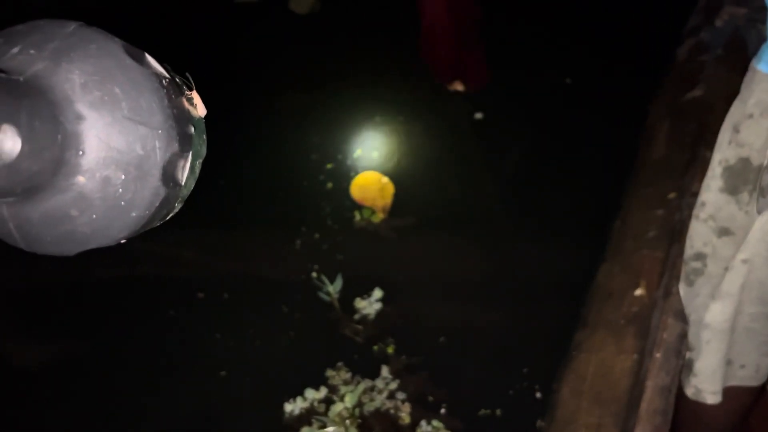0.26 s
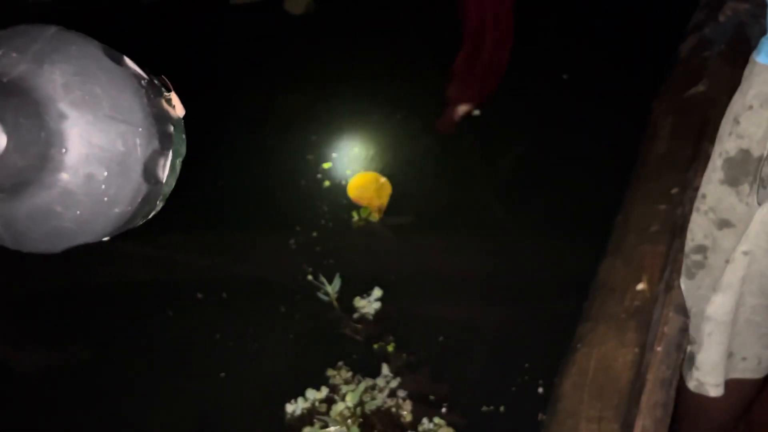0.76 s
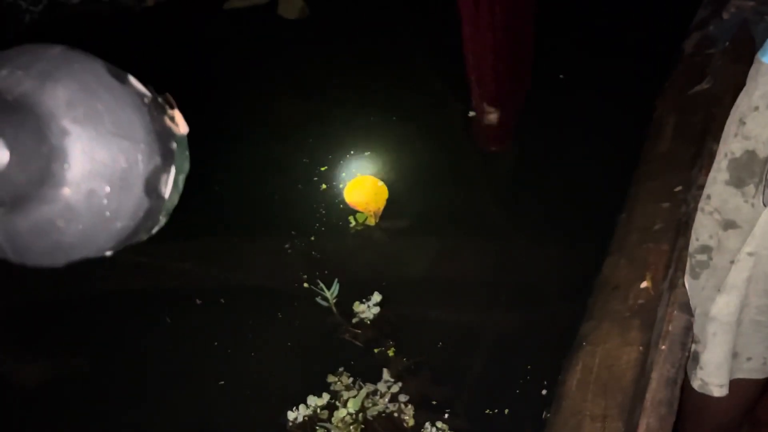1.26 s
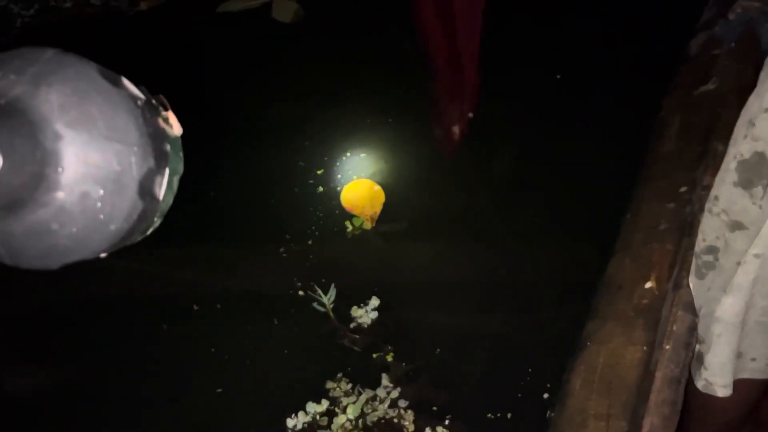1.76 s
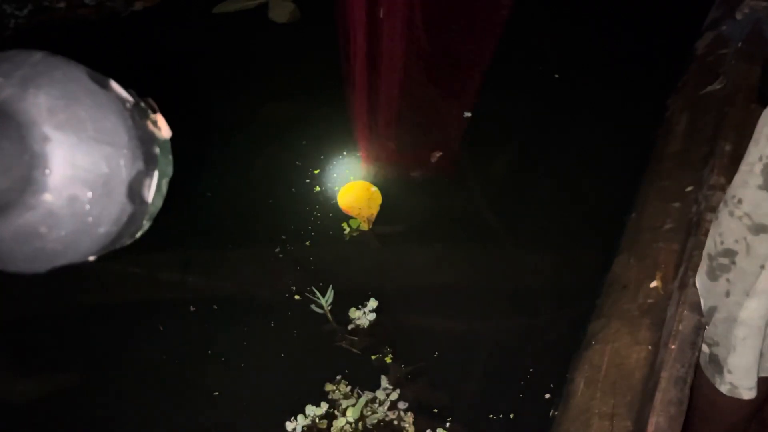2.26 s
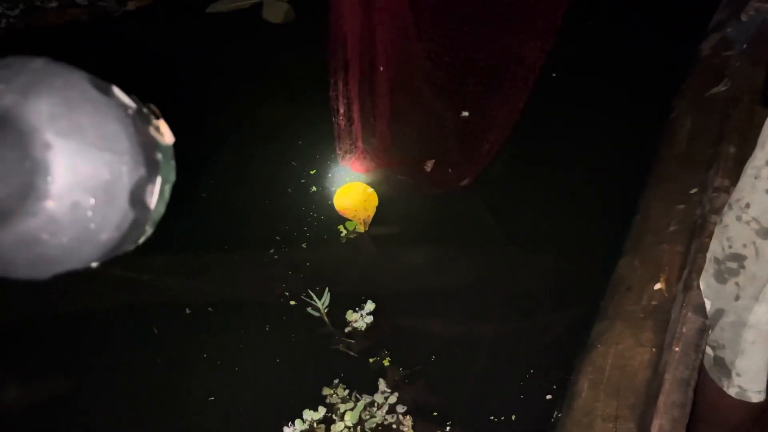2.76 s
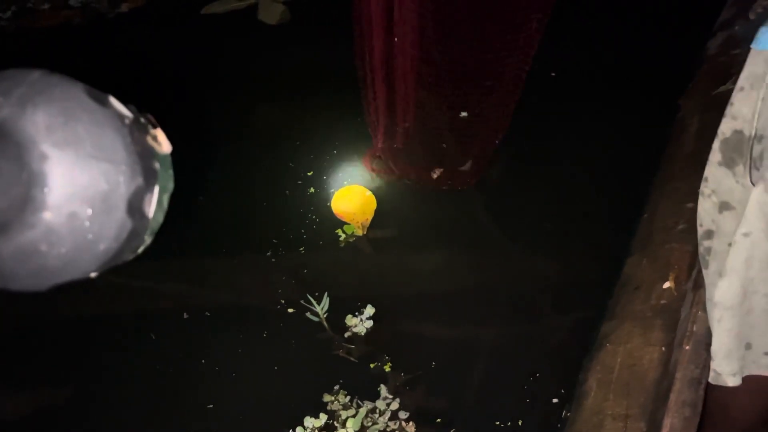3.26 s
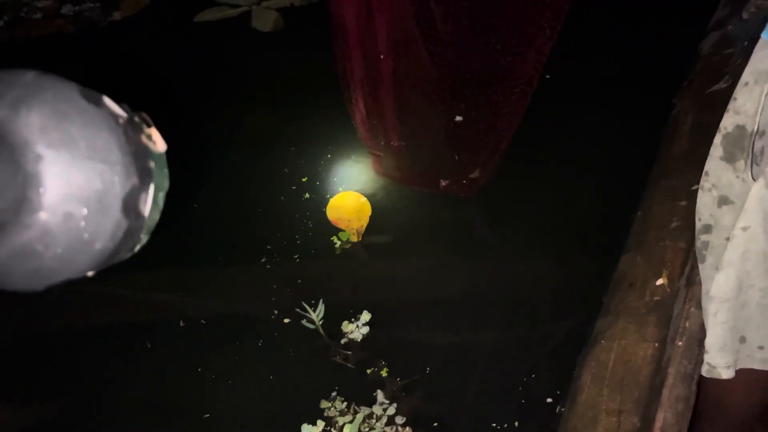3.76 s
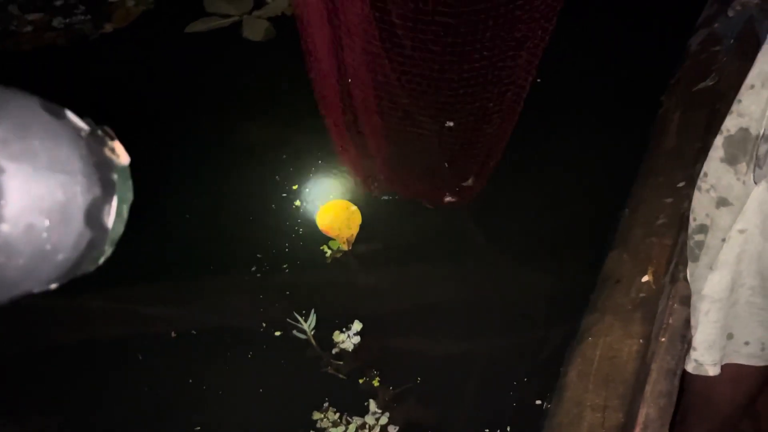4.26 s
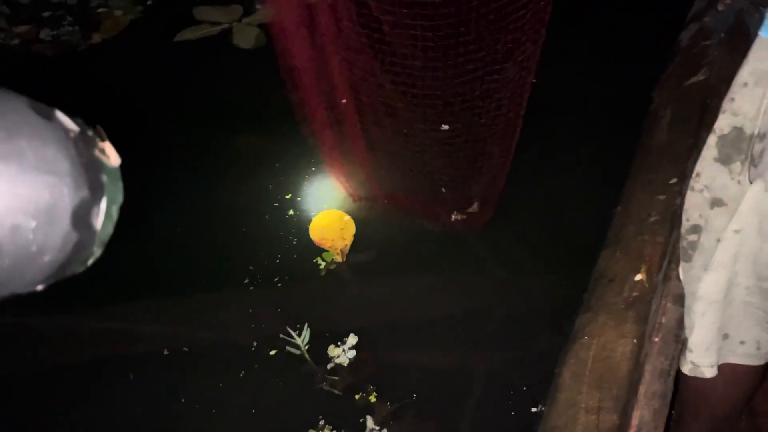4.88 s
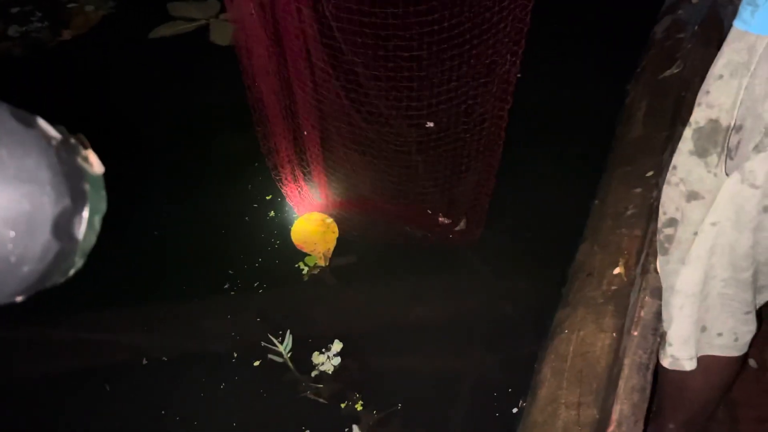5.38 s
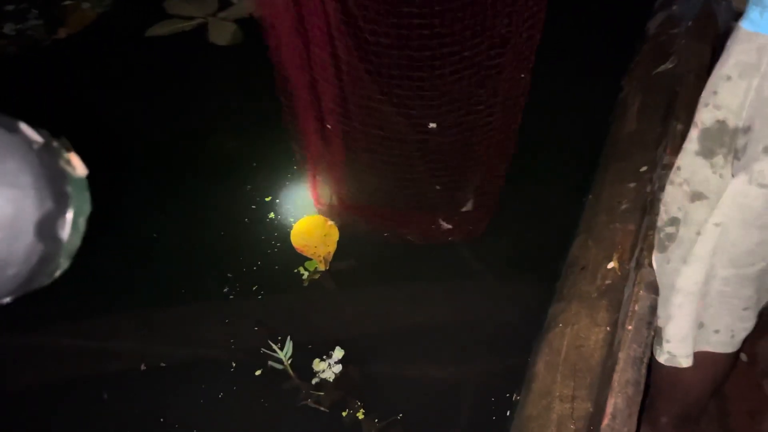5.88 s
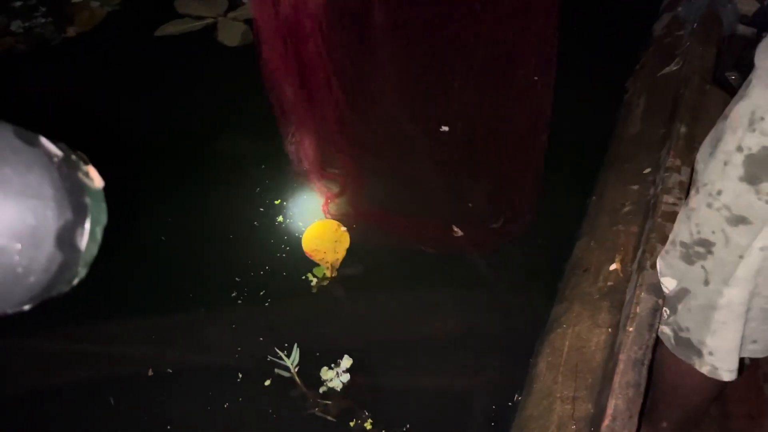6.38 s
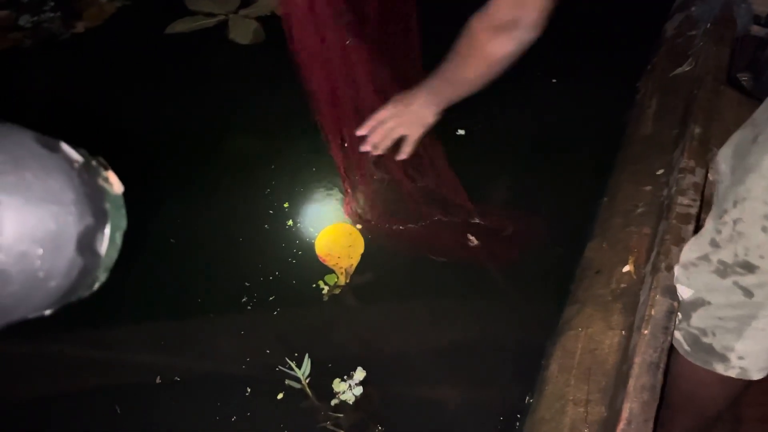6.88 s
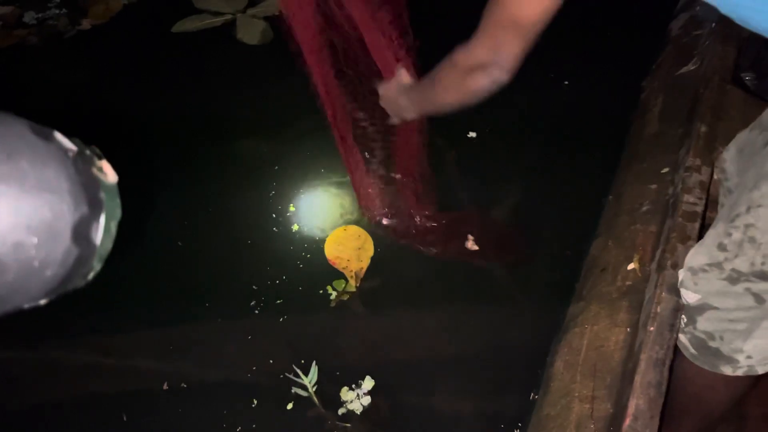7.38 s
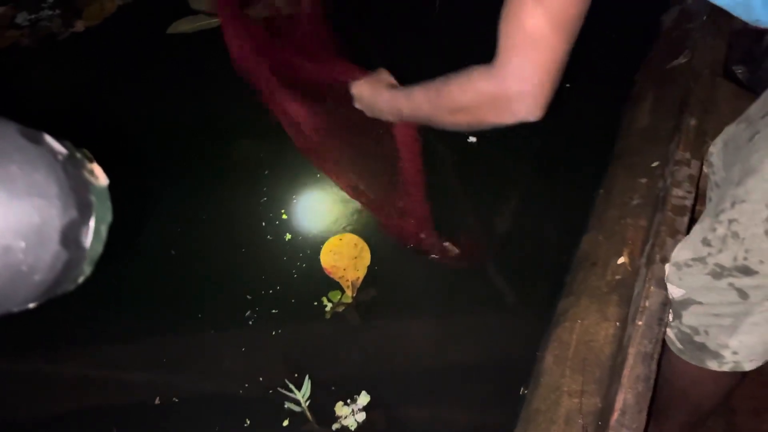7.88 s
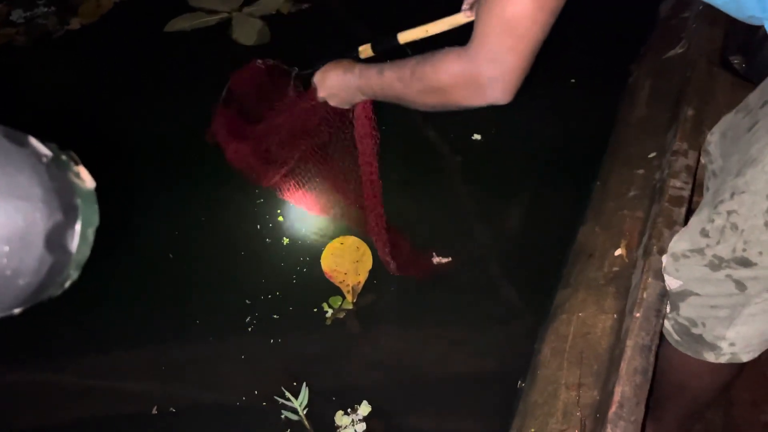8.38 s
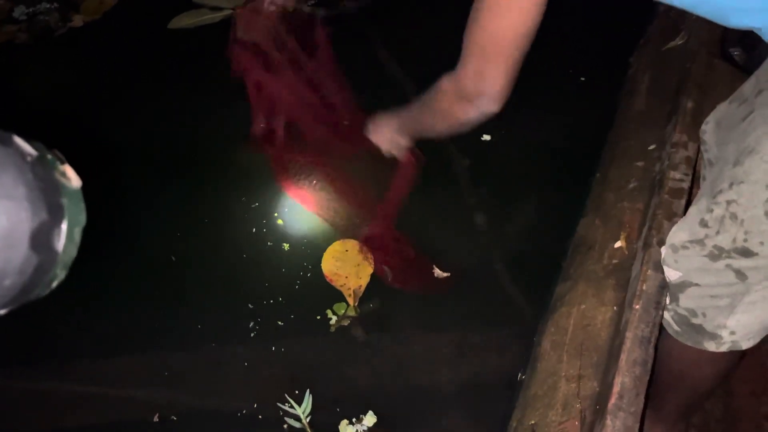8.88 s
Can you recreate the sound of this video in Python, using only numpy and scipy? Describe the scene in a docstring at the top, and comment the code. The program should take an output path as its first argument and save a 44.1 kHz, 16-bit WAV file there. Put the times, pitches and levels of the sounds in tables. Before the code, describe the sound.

A quiet night river heard in stereo from beside a wooden boat, for about nine seconds. Throughout, a katydid holds a very high, dry, raspy buzz above narrow hissing bands of distant insects, low rumble and faint water hush. A near cricket gives quick double chirps around 3 kHz in groups with small gaps; two higher crickets trill in swelling phrases of about a second. From 0.5 to 1.3 s the hull groans low, with soft plank thuds. Hollow frog knocks come in rapid short runs, strongest and leftward at 2.1-2.9 s, then lighter and higher through 8 s, with a strong pair near 8.4 s. Distant frogs murmur in bouts behind. Dull wood thuds fall at 3.4, 3.6 and 4.1 s, and a harder rap at 5.1 s. Tiny gliding peeps sound at 0.6 s, sparsely from 5.9 s, clearest at 8.3 s and clustered to 8.8 s; a barely audible hum swells near 9 s.

```python
"""Night chorus on a river beside a wooden boat

Periodic wing strokes form a katydid's buzz, led by one ear; crickets chirp and trill as short tones and
resonated pulses; a far insect chorus hisses as narrow bands of noise. Frogs knock in short runs as pulses
through throat resonances, gliding tones peep, and noise rings hull and planks as someone shifts weight.
Far rumble and river hush are shaped noise under it all; a faint narrow hum swells once near the end."""
import sys
import numpy as np
from scipy import signal
from scipy.fft import rfft, irfft
from scipy.io import wavfile

SR = 44100
rng = np.random.default_rng(int(sys.argv[2]) if len(sys.argv) > 2 else 0)


def waveform_to_disk(signal):
    """Save audio, clipped to [-1, 1], as 16-bit WAV at the path in sys.argv[1]."""
    frames = np.transpose(np.atleast_2d(signal))
    scaled = np.clip(frames, -1, 1) * 32767
    samples = np.round(scaled).astype(np.int16)
    wavfile.write(sys.argv[1], SR, samples)


N = 403074
HZ = np.maximum(np.arange(N // 2 + 1) * SR / N, 1)  # frequency of each spectrum bin

# Katydid wing-stroke rate: start_s, strokes_hz
STROKES = [(0.0, 277.06), (1.32, 277.25), (3.96, 277.5), (4.95, 277.5), (5.28, 276.0), (5.61, 277.54),
           (5.94, 277.74), (6.27, 278.94), (7.26, 278.78), (7.92, 277.7), (8.3, 277.72), (8.5, 274.96),
           (8.9, 277.18), (9.14, 276.92)]
# Katydid swell, which the rasp follows only in part: start_s, level_db
KATYDID_LEVEL = [(0.0, -53.5), (4.3, -53), (4.66, -54.5), (9.14, -52.5)]
# Relative spectrum of the pitched buzz: frequency_hz, gain_db
BUZZ_SPECTRUM = [(10000, -111), (10800, -13), (11600, -8.5), (12300, 1.5), (13000, -8.5), (13800, -5.5),
                 (14600, -18.5), (15600, -15.5)]
# Relative spectrum of the rasp under it: frequency_hz, gain_db
RASP_SPECTRUM = [(7000, -30), (7800, -10), (8500, -2), (9300, 0), (10200, -1), (11000, -6), (12400, -7),
                 (13300, -13), (14500, -21), (15700, -24)]
RASP_DB = -56.5
# The right ear leads; its phase lead is zero at the first and gains one cycle every TURN Hz
KATYDID_IN_STEP_HZ, KATYDID_TURN_HZ = 11950, 3500

# Far insect bands: centre_hz, width_hz, level_db, left_right_likeness (-1 to 1), flicker_db
CHORUS_BANDS = [(3106, 196, -62, -0.073, 2), (4003, 124, -67.5, 0.087, 0.5), (5317, 305, -69, 0.079, 1.7),
                (6334, 236, -58.5, 0.21, 0.94), (8280, 600, -64, -0.19, 1.5), (6477, 290, -61, 0.16, 0)]

# Phrases, one list for each trilling cricket: start_s, end_s, level_db
TRILL_PHRASES = [
    [(0.0, .85, -62.5), (1.75, 2.65, -62.5), (3.45, 4.45, -65), (5.35, 6.25, -63), (7.15, 8.1, -63),
     (8.95, 9.14, -60)],
    [(1.1, 1.95, -66.5), (3.5, 4.3, -63), (4.6, 5.2, -65), (6.05, 7.3, -65)],
]
# Wing resonance of each trilling cricket: opening_hz, settled_hz, width_hz, pulse_rate_hz
TRILLERS = [(5520, 5710, 110, 49), (5150, 5250, 70, 41.5)]
TRILL_SETTLE_S, TRILL_FADE_S = 0.44, 0.3  # climb to the settled pitch; full linear fade at each end

# Bouts of distant frogs: start_s, end_s, level_db (relative)
FAR_FROG_BOUTS = [(0.0, .12, -63), (0.557, 0.792, -66.5), (1.644, 1.84, -64.5), (2.12, 2.48, -62.5),
                  (2.607, 2.88, -56.5), (3.003, 3.386, -64), (3.627, 3.866, -66), (4.218, 4.765, -63.5),
                  (4.94, 5.344, -62.5), (5.48, 6.037, -60), (6.165, 6.823, -62.5), (7.002, 7.234, -58),
                  (7.576, 7.884, -60.5), (8.4, 9.14, -71)]
FAR_RISE_S, FAR_FADE_S = 0.057, 0.16  # to grow or fade by 20 dB

# Relative spectral density of rumble and hush: frequency_hz, density_db
AIR_SPECTRUM = [(28, -33), (42, -10.5), (63, 4), (80, -4.5), (105, -3.5), (135, -16), (170, -11.5),
                (300, -22), (560, -30), (1000, -26), (2100, -28), (2800, -32.5), (3600, -53), (6000, -110)]
AIR_DB = -57.5
# Coherence of the air noise between the ears: frequency_hz, left_right_likeness (-1 to 1)
AIR_LIKENESS = [(60, 1), (130, 0.66), (290, 0.43), (640, 0.014), (15000, 0.0091)]
# Balance of the air noise: frequency_hz, left_over_right_db
AIR_LEAN = [(60, 4.5), (380, 6), (1290, 5), (2400, -2)]

# Evenly spaced bouts of the near cricket:
# first_chirp_s, last_chirp_s, chirps (count), closings_per_chirp (count), first_db, last_db
CHIRP_BOUTS = [(0.042, 0.93, 5, 2, -49, -48), (1.172, 1.5, 3, 2, -48, -57.5), (1.848, 2.09, 2, 2, -47, -46),
               (2.312, 3.02, 4, 2, -47.5, -49.5), (3.165, 3.164, 1, 1, -49, -46),
               (3.343, 4.04, 4, 2, -50.5, -54), (4.256, 5.86, 7, 2, -52, -53.5),
               (5.83, 6.31, 3, 2, -55, -49), (6.56, 7.21, 4, 2, -51, -47.5), (7.44, 8.1, 4, 2, -49, -59),
               (8.3, 8.452, 2, 1, -49, -51), (8.87, 9.6, 2, 3, -49, -30.5)]
CLOSING_GAP_S, CHIRP_SPREAD_DB = .053, 0.3

# Near frog knocks: start_s, level_db, main_throat_hz, left_over_right_db
KNOCKS = [(0.077, -37.5, 1053, 27), (0.702, -40.5, 1018, -10), (0.75, -42.5, 1066, -7.5),
          (1.123, -47.5, 1290, -19), (1.607, -42.5, 1416, 0), (1.675, -38.5, 1504, 1),
          (1.75, -44, 1290, -2), (1.83, -37, 1510, 10), (2.134, -31.5, 887, 7.5), (2.2, -29, 878, 11),
          (2.267, -34.5, 1314, 5), (2.335, -31, 890, 12), (2.592, -34.5, 875, 8), (2.662, -27.5, 905, 11),
          (2.728, -35, 1203, 12), (2.828, -28.5, 895, 13), (3.157, -41, 1430, 7), (3.222, -39, 1614, -2),
          (3.304, -41, 1275, 17), (3.388, -39, 1504, -2), (3.699, -42.5, 1250, 15), (3.768, -39, 1638, -3),
          (3.841, -44, 1270, 2), (4.203, -48, 1380, 8), (4.238, -43, 1497, -3), (4.295, -46.5, 1726, -1),
          (4.367, -46, 1357, -8), (4.441, -44.5, 1496, -1), (4.485, -41, 1546, 3), (4.545, -37, 1022, -1),
          (4.613, -41, 1370, 11), (4.687, -39, 1610, -4), (4.964, -38.5, 1513, 2), (5.016, -40, 840, 10),
          (5.04, -40, 1604, -2), (5.088, -42, 1400, 0), (5.132, -33, 1292, 3), (5.179, -44, 1444, -14),
          (5.471, -40.5, 1584, -3), (5.528, -37.5, 1100, -3), (5.598, -42, 1414, -2),
          (5.634, -39.5, 1344, 12), (5.742, -40.5, 1410, -1), (5.88, -48, 1400, 1), (6.163, -44, 1475, 2),
          (6.23, -45.5, 1790, 0), (6.305, -46, 1360, 8), (6.368, -47, 1370, 1), (6.547, -42.5, 1096, 0),
          (6.59, -46, 1414, 4), (6.65, -40, 1550, -1), (6.993, -49, 1414, -2), (7.055, -42, 917, 10),
          (7.126, -43, 1528, -12), (7.482, -43, 1457, 2), (7.542, -37, 938, -5), (7.605, -43, 900, 5),
          (7.671, -40, 950, -12), (7.791, -40.5, 1334, 10), (7.859, -37.5, 1567, -6),
          (7.936, -45.5, 1220, -1), (8.007, -40.5, 1664, -2), (8.035, -46, 1677, 8),
          (8.296, -39.5, 1112, 1), (8.363, -30, 1064, 11), (8.418, -31.5, 1018, 12),
          (8.547, -43.5, 1230, 17)]
# Strength of the second throat band, set by the main one: main_throat_hz, gain_db
SECOND_BAND_GAIN = [(890, -36.5), (1100, -16.5), (1600, -5)]
# The second band lies above the main one in knocks whose main band is at or under LOW_UNDER_HZ
SECOND_HZ, SECOND_OF_LOW_HZ, LOW_UNDER_HZ = 860, 1300, 950
KNOCK_SHARPNESS = 1.72  # the higher, the more one pulse stands out
KNOCK_TAIL_DB, KNOCK_TAIL_T60_S = -22.5, .28  # scatter from water and leaves after each knock

# Shifts of weight: start_s, end_s, hull_groan_db, plank_scuff_db, deep_bump_db
SHIFTS = [(0.476, .53, -49, -59, -53), (0.587, .62, -36.5, -56, -60), (0.687, 0.775, -39.5, -70, -70),
          (0.86, 0.957, -57.5, -78, -70), (1.042, 1.083, -45.5, -79, -66), (1.158, 1.175, -40, -66.5, -56),
          (1.22, 1.311, -50, -73.5, -59), (1.717, 1.805, -66.5, -74, -57.5),
          (3.205, 3.422, -59.5, -68.5, -62), (3.618, 3.827, -63, -65.5, -55),
          (3.933, 4.043, -58, -69.5, -55), (4.13, 4.28, -55.5, -68, -51), (4.4, 4.62, -63.5, -71.5, -59),
          (5.14, 5.158, -56, -72, -83)]
SHIFT_RISE_S, SHIFT_FADE_S = 0.076, 0.061  # to grow or fade by 20 dB
SCUFF_LEAD_S = 0.04  # foot and planks move before the hull answers
# Hull modes: frequency_hz, width_hz, relative_db
HULL_MODES = [(157.2, 18.7, 23), (173, 9, -6.5)]
# Plank modes: frequency_hz, width_hz, relative_db
PLANK_MODES = [(333, 98, 9.5), (459, 100, 5.5), (840, 420, 7)]
# Deep bilge mode: frequency_hz, width_hz, relative_db
BILGE_MODES = [(99.3, 48.5, 0.)]
# Thuds on the planks: start_s, level_db, resonance_hz
THUDS = [(0.488, -41.5, 467), (0.538, -47.5, 470), (3.365, -44.5, 342), (3.632, -44, 360), (4.09, -51, 345),
         (5.133, -46, 393), (5.236, -51.5, 437)]
RAP_S, RAP_DB = 5.133, -40  # one thud carries a hard rap

# Short gliding peeps, bubbles or small frogs:
# start_s, length_s, start_hz, end_hz, level_db, right_ear_lag_cycles
PEEPS = [(0.629, 0.041, 1128, 1030, -46.5, 0.247), (5.905, 0.057, 972, 1000, -53.5, 0.34),
         (6.483, 0.036, 1095, 946, -55, 0.2), (7.153, 0.074, 1105, 935, -52, 0.17),
         (8.293, 0.038, 986, 1434, -39.5, 0.23), (8.708, 0.026, 1696, 1640, -52, 0.19),
         (8.723, 0.042, 2080, 2180, -60, 0.24), (8.791, 0.028, 1615, 1366, -48, 0.24),
         (8.828, 0.019, 1550, 1400, -57, 0.25)]

HUM_S, HUM_HZ, HUM_DB = 8.95, 685, -67
BANK_T60_S, BANK_DB = .2, -9
CUTOFF_HZ = 15750


def from_db(db):
    """Logarithmic level: 20 dB multiply amplitude by ten."""
    return 10 ** (np.asarray(db) / 20)


def rms_one(x):
    """Normalization: divide by the root of the mean power."""
    return x / np.sqrt(np.mean(x ** 2) + 1e-20)


def in_time(rows):
    """Linear interpolation: each column of a time table at every sample."""
    s, *columns = np.transpose(rows)
    return [np.interp(np.arange(N) / SR, s, c) for c in columns]


def at_hz(points, hz):
    """Logarithmic frequency scale: interpolate a spectrum table along it."""
    frequency, value = np.transpose(points)
    return np.interp(np.log(hz), np.log(frequency), value)


def drift(rate_hz):
    """Low-passed noise: a slow random fluctuation of about unit spread."""
    r = np.exp(-80 * np.pi * rate_hz / SR)  # double pole, one step per 40 samples
    slow = signal.lfilter([1], [1, -2 * r, r * r], rng.standard_normal(N // 40 + 2002))
    slow = slow[2000:]  # drop the filter's start-up
    return np.interp(np.arange(N) / 40, np.arange(len(slow)), rms_one(slow))


def resonate(x, hz, width_hz):
    """Damped resonance: a pole pair rings at one frequency, with about unit gain at its peak."""
    r = np.exp(-np.pi * width_hz / SR)
    zeros = [(1 - r * r) / 2, 0, (r * r - 1) / 2]
    poles = [1, -2 * r * np.cos(2 * np.pi * hz / SR), r * r]
    return signal.lfilter(zeros, poles, x + 1e-18)


def bell(hz, width_hz):
    """Gaussian band: gain falls with squared distance from the centre, the width being one deviation."""
    return np.exp(-.5 * ((HZ - hz) / width_hz) ** 2)


def stereo_noise(gain, alike):
    """Interaural coherence: mid and side noise are weighted for the wanted likeness, rms 1."""
    mid, side = rfft(rng.standard_normal((2, N))) * gain
    alike = np.clip(alike, -1, 1)
    ears = np.sqrt(1 + alike) * mid + np.sqrt(1 - alike) * side * [[1], [-1]]
    return rms_one(irfft(ears, N))


def pan(db):
    """Interaural level difference: half goes to each ear, positive to the left."""
    return from_db(np.array([[.5], [-.5]]) * db)


def add(out, s, sound):
    """Superposition: mix a short stereo sound in at a time."""
    i = round(s * SR)
    out[:, i:i + sound.shape[1]] += sound[:, :N - i]


def glide(length, start_hz, end_hz, lag):
    """Linear frequency sweep: phase grows quadratically, the right ear some cycles late."""
    t = np.arange(round(length * SR)) / SR
    cycles = start_hz * t + (end_hz - start_hz) * t ** 2 / (2 * length)
    cycles = cycles - np.array([[0], [lag]])
    return np.sin(np.pi * t / length) ** 0.23 * np.sin(2 * np.pi * cycles)


def bouts(start, end, db, rise_s, fade_s):
    """Exponential growth and decay: gain rises to each bout, holds and fades."""
    t = np.arange(N) / SR
    gain = 0
    for a, b, level_db in zip(start, end, db):
        outside = np.maximum((a - t) / rise_s, (t - b) / fade_s).clip(0, 6)  # in steps of 20 dB
        gain = gain + from_db(level_db - 20 * outside)
    return gain


def katydid():
    """Harmonic series: regular strokes give a comb of lines; leaves make each fade by itself."""
    phase = 2 * np.pi * np.cumsum(in_time(STROKES)[0] + 0.111 * drift(9.5)) / SR
    mean_hz = np.mean(np.array(STROKES)[:, 1])
    buzz = 0
    for k in range(36, 57):
        line_gain = from_db(at_hz(BUZZ_SPECTRUM, k * mean_hz) + 3.0 * drift(26))
        buzz = buzz + line_gain * np.sin(k * phase + 1.16 * drift(14))
    rasp = irfft(rfft(rng.standard_normal(N)) * from_db(at_hz(RASP_SPECTRUM, HZ)), N)
    swell_db = in_time(KATYDID_LEVEL)[0]
    rasp_db = RASP_DB + .3 * (swell_db - swell_db.mean())
    song = from_db(swell_db - 2.0) * rms_one(buzz) + from_db(rasp_db) * rms_one(rasp)
    lead = np.exp(2j * np.pi * (HZ - KATYDID_IN_STEP_HZ) / KATYDID_TURN_HZ)
    return np.array([song, irfft(rfft(song) * lead, N)])


def chorus():
    """Incoherent summation: countless wing clicks blur into noise around each kind's pitch."""
    out = 0
    for hz, width, db, alike, flicker_db in CHORUS_BANDS:
        out = out + from_db(db + flicker_db * drift(13.4)) * stereo_noise(bell(hz, width), alike)
    return out


def trills():
    """Forced resonance: nearly even pulses drive a wing band that climbs, by another path to each ear."""
    out, t = 0, np.arange(N) / SR
    for (open_hz, settled_hz, width, pulse_hz), phrases in zip(TRILLERS, TRILL_PHRASES):
        count = np.floor(np.cumsum(pulse_hz * (1 + .012 * drift(4))) / SR)
        pulses = np.diff(count, prepend=0) * from_db(2 * drift(20))
        echoes = rng.standard_normal((2, 3000)) * np.exp(-np.arange(3000) / 700)
        driven = rfft(pulses) * rfft(echoes, N)
        low = rms_one(irfft(driven * bell(open_hz, width), N))
        high = rms_one(irfft(driven * bell(settled_hz, width), N))
        for start, end, db in phrases:
            # Half amplitude at the phrase's start and end
            swell = from_db(db) * np.clip(np.minimum(t - start, end - t) / TRILL_FADE_S + .5, 0, 1)
            climb = np.pi / 2 * np.clip((t - start) / TRILL_SETTLE_S, 0, 1)
            out = out + swell * (np.cos(climb) * low + np.sin(climb) * high)
    return out


def far_frogs():
    """Random arrivals: distant knocks differ in pitch and side, over noise for their merged echo."""
    knocks, sizes = 0, from_db(5.5 * rng.standard_normal((2, N)))
    born = rng.random(N) < 110 / SR  # 110 knocks per second on average
    voice = rng.integers(0, 8, N)
    for k, hz in enumerate(np.geomspace(800, 2500, 8)):
        ring = resonate(resonate(sizes * born * (voice == k), hz, 147), hz, 147)
        knocks = knocks + ring * from_db(-5 * np.log2(hz / 800))
    echo = stereo_noise(bell(883, 180) + 1.37 * bell(1430, 224) + 0.88 * bell(2650, 470), 0)
    swell = bouts(*np.transpose(FAR_FROG_BOUTS), FAR_RISE_S, FAR_FADE_S)
    return swell * (0.68 * rms_one(knocks) + 0.98 * echo)


def night_air():
    """Partially coherent noise: far rumble and river hush grow less alike between the ears with pitch."""
    noise = stereo_noise(from_db(at_hz(AIR_SPECTRUM, HZ)), at_hz(AIR_LIKENESS, HZ))
    air = rfft(noise) * pan(at_hz(AIR_LEAN, HZ))
    return from_db(AIR_DB + 0.98 * drift(4.5)) * irfft(air, N)


def cricket():
    """Interaural phase: each wing closing is a tone sagging in pitch that reaches the ears out of step."""
    out, closing = np.zeros((2, N)), glide(0.028, 3350, 3010, 0.36)
    for first, last, chirps, closings, first_db, last_db in CHIRP_BOUTS:
        times, levels = np.linspace([first, first_db], [last, last_db], round(chirps)).T
        levels = levels + CHIRP_SPREAD_DB * rng.standard_normal(len(times))
        for s, db in zip(times, levels):
            for k in range(round(closings)):
                add(out, min(s + CLOSING_GAP_S * k, N / SR), from_db(db) * closing)
    return out


def frogs():
    """Source and filter: uneven vocal-fold pulses swell and stop, exciting four throat bands."""
    out, t = np.zeros((2, N)), np.arange(6000) / SR
    tail_gain = from_db(KNOCK_TAIL_DB - 60 * t / KNOCK_TAIL_T60_S) * np.minimum(t / .014, 1)
    effort = np.array([.12, .25, .45, .75, 1, .75, .45, .25])
    for s, db, hz, side_db in KNOCKS:
        tail = rng.standard_normal((2, len(t))) * tail_gain
        pulse_hz = hz / np.round(hz / 430)  # the main band sits on a multiple of the pulse rate
        at = 40 + (np.arange(8) + .05 * rng.standard_normal(8)) * SR / pulse_hz
        pulses = np.zeros(len(t))
        pulses[np.abs(at).astype(int)] = effort ** KNOCK_SHARPNESS * from_db(0.84 * rng.standard_normal(8))
        ear_lag = round(12 * rng.standard_normal())  # samples
        drive = pan(side_db) * np.array([pulses, np.roll(pulses, ear_lag)])
        second_hz = SECOND_HZ if hz > LOW_UNDER_HZ else SECOND_OF_LOW_HZ
        # frequency_hz, width_hz, level_db, scatter_db, delay_s (wraps round within the knock)
        bands = [(second_hz, 220, at_hz(SECOND_BAND_GAIN, hz), -4, 0),
                 (hz, 250, -1, -4, 0),
                 (1633, 234, -12.5, 6, -0.15),
                 (2454, 509, -10.5, 5.5, 0)]
        knock = 0
        for f, width, band_db, scatter_db, late in bands:
            excitation = np.roll(drive, round(late * SR), axis=1) + from_db(scatter_db) * tail
            ring = resonate(resonate(excitation, f, width), f, width)
            knock = knock + from_db(db + band_db) * ring / np.abs(ring).max()
        add(out, s - .007, knock)
    return signal.sosfilt(signal.butter(3, [680, 3600], "band", fs=SR, output="sos"), out)


def boat():
    """Stick-slip friction: random slips ring hull, planks and bilge; decaying contacts thud and rap."""
    out, t = np.zeros((2, N)), np.arange(SR // 10) / SR
    start, end, *levels = np.transpose(SHIFTS)
    leads, sides_db = (0, SCUFF_LEAD_S, SCUFF_LEAD_S), (3.5, 6, 4)
    for modes, level_db, lead, side_db in zip((HULL_MODES, PLANK_MODES, BILGE_MODES), levels, leads, sides_db):
        slips, body = rng.standard_normal(N), 0
        for hz, width, db in modes:
            ring = resonate(resonate(slips, hz, width), hz, 2.7 * width)
            body = body + from_db(db) * rms_one(ring)
        swell = bouts(start - lead, end - lead, level_db, SHIFT_RISE_S, SHIFT_FADE_S)
        out = out + pan(side_db) * swell * rms_one(body)
    for s, db, hz in THUDS:
        contact = rng.standard_normal(len(t)) * from_db(-60 * t / 0.18)
        thud = resonate(contact, hz, 113)
        add(out, s - .002, pan(5.7) * from_db(db) * thud[None] / np.abs(thud).max())
    dull = signal.butter(3, 3000, fs=SR, output="sos")
    rap = signal.sosfilt(dull, rng.standard_normal((2, len(t)))) * from_db(-60 * t / .06)
    add(out, RAP_S, pan(8.2) * from_db(RAP_DB) * rap)
    return out


def peeps():
    """Second harmonic: each sliding tone carries a weaker octave, and its level wavers."""
    out = np.zeros((2, N))
    for s, length, start_hz, end_hz, db, lag in PEEPS:
        tone = glide(length, start_hz, end_hz, lag)
        octave = glide(length, 2 * start_hz, 2 * end_hz, 2 * lag)
        add(out, s, from_db(db) * (tone + 0.52 * octave))
    return out * from_db(2 * drift(50))


def hum():
    """Narrow-band noise: a faint hum swells and fades once."""
    swell = np.exp(-.5 * ((np.arange(N) / SR - HUM_S) / 0.12) ** 2)
    return from_db(HUM_DB) * swell * stereo_noise(bell(HUM_HZ, 74), 0)


def bank(near):
    """Diffuse reflection: the wooded bank scatters a sound back as a short blur."""
    t = np.arange(SR // 2) / SR
    blur = rng.standard_normal((2, len(t))) * from_db(-60 * t / BANK_T60_S) * (t > .004)
    blur = blur / np.sqrt(np.sum(blur ** 2, axis=1, keepdims=True))
    return near + from_db(BANK_DB) * signal.fftconvolve(near, blur, axes=1)[:, :N]


def scene():
    """Superposition: the pressures of all sources add at each ear."""
    insects = katydid() + chorus() + trills()
    scattered = bank(cricket() + peeps() + far_frogs())
    return insects + scattered + frogs() + boat() + night_air() + hum()


def record(dry):
    """Band limiting: a steep elliptic low-pass cuts the top."""
    return signal.sosfilt(signal.ellip(12, .5, 80, CUTOFF_HZ, fs=SR, output="sos"), dry)


dry = scene()
out = record(dry)
waveform_to_disk(out)
```